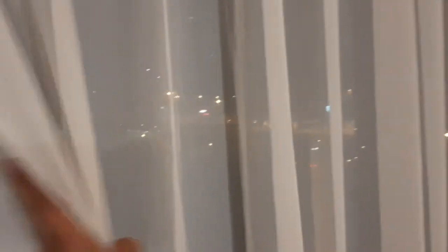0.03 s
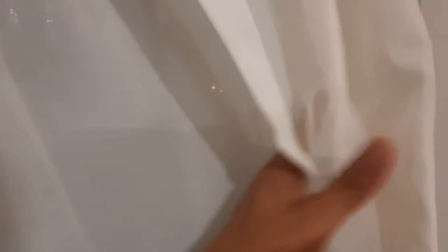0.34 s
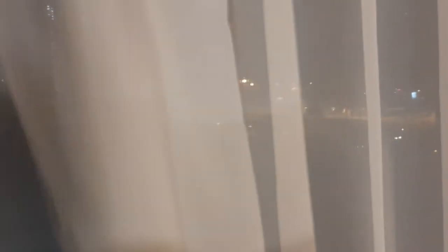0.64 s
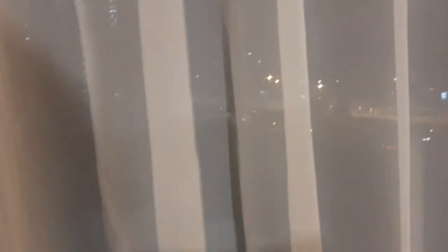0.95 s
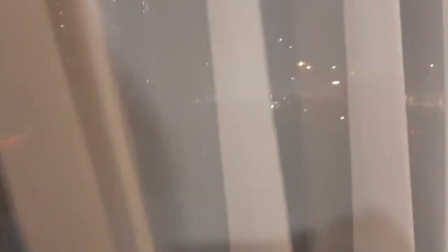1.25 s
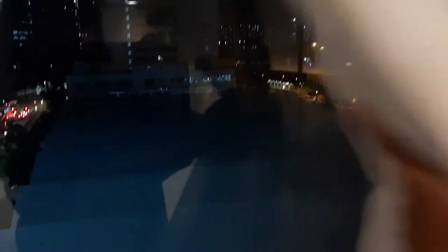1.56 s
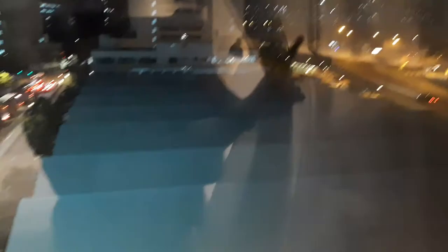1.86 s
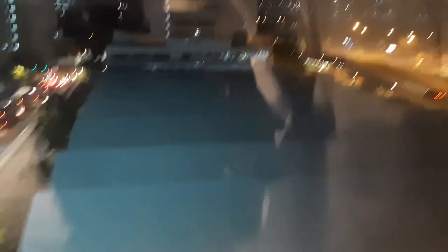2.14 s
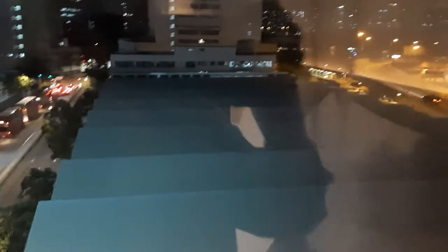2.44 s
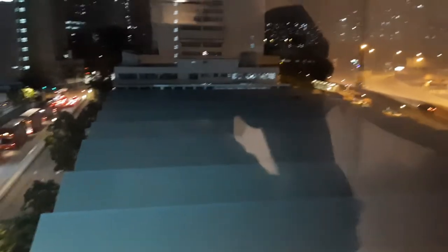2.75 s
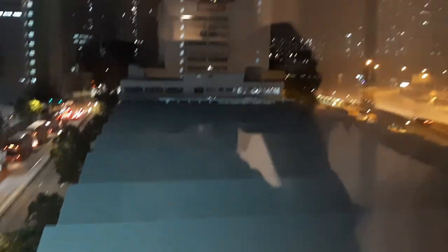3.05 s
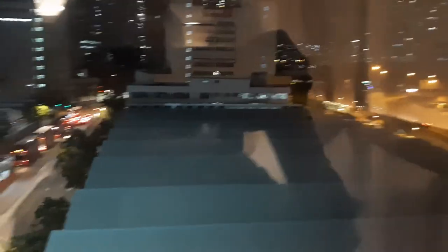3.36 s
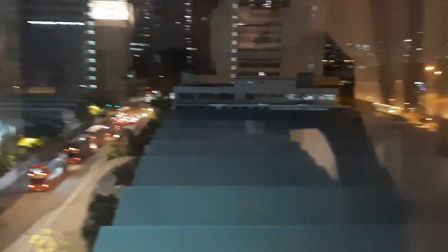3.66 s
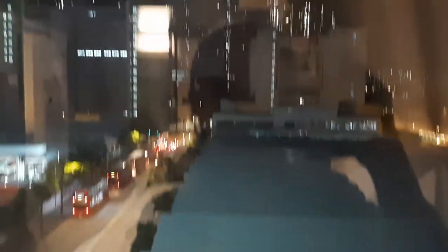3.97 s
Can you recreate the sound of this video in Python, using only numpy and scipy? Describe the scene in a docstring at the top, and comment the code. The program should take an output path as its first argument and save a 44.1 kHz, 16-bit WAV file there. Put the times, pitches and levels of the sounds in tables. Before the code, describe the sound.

Curtains swept aside with a soft rustle and a few dull bumps over ventilation hum.

```python
"""Sheer curtains at a hotel window.

Close on a small stereo microphone, a hand sweeps the curtains aside. The cloth hisses as it slides,
crumples, snaps taut and squeaks on the glass; gliders tick up on the rail. The bumped window frame
rings, and handling thuds and taps on the microphone. Ventilation hums in the room throughout,
and distant city traffic comes faintly through the pane."""
import sys
import numpy as np
from scipy import signal
from scipy.fft import rfft, irfft
from scipy.io import wavfile

SR = 44100
rng = np.random.default_rng(int(sys.argv[2]) if len(sys.argv) > 2 else 0)


def inscribe(sig):
    """Save sig as 16-bit PCM at rate SR to the path in sys.argv[1].

    A 1-D sig is mono; a 2-D sig holds one channel per row.
    Samples are clipped to [-1, 1] before scaling.
    """
    pcm = np.round(np.clip(np.atleast_2d(sig).T, -1, 1) * 32767)
    wavfile.write(sys.argv[1], SR, pcm.astype(np.int16))


N = 176400


def sliding():
    """Threads rub over threads: a fine, fluttering hiss over the dull brushing of the bunched cloth."""
    # spectra of the weave and of the bunched cloth: f/Hz, density/dB per Hz
    weave = [(100, -110), (450, -88.5), (1100, -101), (2000, -98), (3000, -99), (5500, -99), (9000, -101),
             (13000, -100), (16000, -100)]
    brush = [(100, -100), (280, -90), (460, -81), (650, -87.5), (1000, -107.5), (2500, -112), (16000, -140)]
    # their levels through the sweep: t/s, level/dB
    hiss_level = [(0, 4.5), (.12, 3.5), (.36, -5.5), (.76, -3.5), (.83, 1), (.93, -3), (1.05, -7),
                  (1.33, -8), (1.47, 0.5), (1.6, 2), (1.72, 3), (1.95, 6), (2.17, 6), (2.33, 3.5),
                  (2.47, 0), (2.56, -7), (2.8, -13)]
    brush_level = [(0, 0.5), (.5, 1.5), (1.1, -2), (1.75, -1), (1.86, 10), (2.0, 2.5), (2.5, -30)]
    hiss = noise(weave) * amp(curve(hiss_level) + drift(hz=40)) * pan(db=0.25)
    brushing = noise(brush) * amp(curve(brush_level) + 2 * drift(hz=8.7))
    return hiss + brushing


def folds():
    """Each fold buckles in a swell of tiny uneven snaps, strongest near its own pitch."""
    # crumpling folds: t/s, length/s, level/dB, f/Hz
    buckles = [(0.196, 0.034, -1, 3330), (0.39, 0.026, -4, 2420), (0.439, 0.035, -4.5, 3370),
               (0.545, 0.093, -4.5, 3630), (0.795, 0.045, -7.5, 4250), (0.859, 0.041, 3, 3560),
               (1.502, .02, 0, 3750), (1.681, 0.042, 0, 3080), (1.75, 0.027, -3.5, 3150),
               (1.798, 0.039, 0, 3640), (1.828, 0.044, 2.5, 3250), (1.864, 0.025, 2.5, 3700),
               (1.921, 0.027, 6, 3800), (1.978, 0.014, 0, 3550), (2.03, 0.019, -4, 4800),
               (2.242, 0.4, -8.5, 2700)]
    # spectrum of the crumpling: f/Hz, density/dB per Hz
    crumple = [(150, -105), (550, -105.5), (1100, -84.5), (2300, -91), (3400, -88.5), (4600, -89),
               (6200, -88.5), (9000, -104), (16000, -110)]
    snaps_per_s, spread_db = 1500, 1.5
    out, t = np.zeros((2, N)), np.arange(SR // 2) / SR
    for start, length, db, pitch in buckles:
        effort = np.sqrt(np.interp(t / length, [0, 0.17, 1], [0, 1, 0]))
        fires = rng.random(len(t)) < snaps_per_s / SR
        strength = amp(spread_db * np.minimum(rng.exponential(1, len(t)), 3))
        snaps = unit(fires * strength * rng.choice([-1, 1], (2, len(t))))
        resonance = 0.71 + 1.12 * bell(len(t), pitch, octaves=0.11)
        add(out, start, amp(db) * irfft(rfft(snaps * effort) * resonance, len(t)))
    return colour(out, crumple) * np.sqrt(SR / 2)


def ticks():
    """Cloth pulled taut snaps, each time around its own pitch."""
    # snaps of taut cloth: t/s, level/dB, f/Hz
    snaps = [(.2022, -2, 3440), (.584, -5.5, 3870), (0.7975, 11.5, 5700), (0.801, 3, 3040),
             (1.5072, 7.5, 5230), (1.927, 7, 4400), (1.970, 4, 5000)]
    gain_db, decay_s = -45, 0.0016
    out, t = np.zeros((2, N)), np.arange(SR // 20) / SR
    for start, db, pitch in snaps:
        white = rfft(rng.standard_normal((2, len(t))))
        burst = unit(irfft(white * bell(len(t), pitch, octaves=0.61), len(t)))
        add(out, start, amp(gain_db + db) * burst * np.exp(-t / decay_s))
    return out


def flick():
    """Cloth whips over cloth: a bright hiss that rises fast and dies away."""
    start, rise_s, fall_s = 0.768, 0.026, 0.053
    t = np.maximum(np.arange(N) / SR - start, 0)
    swell = np.minimum(t / rise_s, 1) * np.exp(-np.maximum(t - rise_s, 0) / fall_s)
    bright_hiss = unit(np.diff(rng.standard_normal((2, N + 1))))
    return amp(-46) * swell * bright_hiss


def squeaks():
    """Cloth sticks and slips on the glass, off to the right: a thin, unsteady whistle."""
    # slips on the pane: t/s, length/s, level/dB, f/Hz, jitter/fraction of f
    slips = [(1.818, 0.041, -48, 1525, .08), (2.06, 0.18, -60.5, 2040, .016), (2.297, 0.02, -58, 2035, 0)]
    rough_db = 4.5
    out = np.zeros(N)
    for start, length, db, pitch, jitter in slips:
        effort = np.sin(np.pi * np.arange(0, 1, 1 / (length * SR))) ** .5
        phase = 2 * np.pi * np.cumsum(pitch * (1 + jitter * drift(hz=250))) / SR
        whistle = np.sin(phase) * amp(db + rough_db * drift(hz=151))
        add(out, start, effort * whistle[:len(effort)])
    return out * pan(db=-11) / 2


def gliders():
    """Small gliders knock together up on the rail, each a little different in pitch."""
    # clicks on the rail: t/s, level/dB
    clicks = [(.1615, 5.5), (1.055, -2), (1.154, 0.5), (1.239, -1), (1.2435, 1.5), (1.294, -8)]
    # a glider's modes: f/Hz, level/dB, t60/s
    modes = [(5100, 0.5, 0.013), (5970, 4.5, 0.0046), (8640, 7, .011), (13900, -16, 0.008)]
    gain_db, contact_s = -43.5, 0.0021
    out, t = np.zeros((2, N)), np.arange(SR // 10) / SR
    for start, db in clicks:
        contact = 0.88 * rng.standard_normal((2, len(t))) * np.exp(-t / contact_s)
        ring = ringing(modes, t * rng.uniform(.95, 1.05))
        add(out, start, amp(gain_db + db) * (ring + contact) / 2)
    return out + room(out, db=-7)


def bumps():
    """Dull, dry handling thuds on the microphone's left port, while the window frame rings into the room."""
    # bumps: t/s, handling thud level/dB, handling thud f/Hz, frame ring level/dB
    knocks = [(0.482, -44, 520, -42), (1.694, -41, 110, -39.5), (1.7479, -23, 100, -39.5),
              (1.7768, -23.5, 95, -61), (1.788, -18, 129, -39), (1.797, -21.5, 81, -44),
              (1.8094, -25.5, 131, -32), (1.824, -15.5, 77, -28), (1.8372, -27, 200, -35),
              (1.8656, -23, 131, -35.5), (1.91, -50, 155, -32), (2.024, -40, 574, -59),
              (2.111, -35, 663, -37.5), (2.192, -47.5, 615, -52)]
    # modes of frame and pane: f/Hz, level/dB, t60/s
    modes = [(282, -10.5, 0.1), (390, -2.5, 0.088), (477.7, 0, 0.12), (556, -12, 0.14), (633, -4, 0.051),
             (990, -11.5, 0.029), (1447, -12, 0.018)]
    thud_s, ring_rise_s, right_db = 0.0034, 0.00054, -17.5
    handling, frame, t = np.zeros((2, N)), np.zeros((2, N)), np.arange(SR // 2) / SR
    push = t / thud_s * np.exp(1 - t / thud_s)
    for start, thud_db, thud_hz, ring_db in knocks:
        thud = push * np.sin(2 * np.pi * thud_hz * t) * amp([[0], [right_db]])
        ring = ringing(modes, t) * (1 - np.exp(-t / ring_rise_s))
        add(handling, start, amp(thud_db) * thud)
        add(frame, start, amp(ring_db) * ring / 2)
    return handling + frame + room(frame)


def taps():
    """Handling noise, mostly at the right port: a finger's pulse, a rattle, the ring of the spot struck."""
    # fingers on the microphone's case: t/s, level/dB, f/Hz
    knocks = [(1.9165, -6, 1600), (1.941, -8, 1520), (2.1207, -3.5, 990), (2.1773, -14, 1110),
              (2.195, -15, 1010)]
    # response of the hollow case: f/Hz, gain/dB
    hollow_case = [(100, -9), (480, 7), (750, 1.5), (1150, 0), (1600, -7.5), (2250, -7.5), (3200, -35),
                   (16000, -20)]
    gain_db, rattle_s, ring_s = -23.5, 0.0024, 0.003
    out, t = np.zeros((2, N)), np.arange(SR // 50) / SR
    pulse = 4 * (t == 0)
    for start, db, pitch in knocks:
        rattle = 0.32 * rng.standard_normal((2, len(t))) * np.exp(-t / rattle_s)
        ring = 0.095 * np.cos(2 * np.pi * pitch * t) * np.exp(-t / ring_s)
        add(out, start, amp(gain_db + db) * (pulse + rattle + ring))
    return colour(out, hollow_case) * pan(db=-17.5)


def ventilation():
    """Room tone: a motor's hum and its octave over the rumble of moving air, which grows with it."""
    # the hum, louder by the window: t/s, level/dB
    hum_level = [(0, -42.5), (1.4, -43.5), (2.2, -41), (3, -40.5)]
    # moving air: f/Hz, density/dB per Hz
    rumble = [(24, -100), (35, -63.5), (44, -82.5), (57, -62), (78, -89.5), (145, -68.5), (210, -80.5),
              (300, -87), (450, -85.5), (700, -96), (1500, -101), (3000, -114), (8000, -133), (16000, -121)]
    hum_hz, level = 100, curve(hum_level)
    phase = 2 * np.pi * hum_hz * np.arange(N) / SR + 0.24 * drift(hz=0.71)
    octave = amp(-17 + 2.5 * drift(hz=4)) * np.sin(2 * phase + .5 * drift(hz=7))
    air = noise(rumble) * amp(0.73 * (level - level.mean()))
    hum = np.sqrt(2) * (np.sin(phase) + octave) * amp(level + 0.43 * drift(hz=7.4))
    return hum + air


def traffic():
    """A distant wash of road noise through the pane, a little to the right."""
    # traffic behind the glass: f/Hz, density/dB per Hz
    road = [(30, -67), (180, -76.5), (300, -80), (560, -99), (880, -87.5), (1200, -98), (1540, -96),
            (2010, -94.5), (2700, -103), (4000, -112), (5600, -112), (7300, -133), (16000, -121)]
    # its level as the curtain opens: t/s, level/dB
    opening = [(0, -2.5), (1.3, -4), (2.3, -2), (2.82, -2.5), (3.13, 2.5), (3.35, -0.5), (3.72, -3),
               (3.86, 3)]
    return noise(road) * amp(curve(opening) + 1.58 * drift(hz=6.6)) * pan(db=-4)


def room(x, db=-4.5):
    """The short tail of a furnished room, without the direct sound."""
    t60, first_echo_s = 0.41, 0.004
    t = np.arange(SR // 2) / SR
    tail = rng.standard_normal((2, len(t))) * amp(-60 * t / t60) * (t > first_echo_s)
    return amp(db) * signal.oaconvolve(x, tail / np.linalg.norm(tail[0]), axes=1)[:, :N]


def noise(points):
    """Diffuse stereo noise with the given dB per Hz, alike at both ports in the bass."""
    # likeness of left and right: f/Hz, correlation/0-1
    likeness = [(100, 0.88), (290, 0.84), (640, 0.55), (1400, 0), (16000, 0)]
    same = spectrum(likeness)
    left, independent = rfft(rng.standard_normal((2, N)))
    right = same * left + np.sqrt(1 - same ** 2) * independent
    return irfft(np.array([left, right]) * amp(spectrum(points)), N) * np.sqrt(SR / 2)


def ringing(modes, t):
    """Dying modes; the higher ones reach the two ports out of step."""
    hz, level, t60 = np.transpose(modes)[:, :, None]
    phase = 2 * np.pi * rng.random(hz.shape) + rng.standard_normal((2, len(hz), 1)) * hz / 1500
    return (amp(level - 60 * t / t60) * np.sin(2 * np.pi * hz * t + phase)).sum(1)


def bell(size, pitch, octaves):
    """A resonance curve over the bins of a short sound."""
    octaves_off = np.log2((np.fft.rfftfreq(size, 1 / SR) + 1) / pitch)
    return 1 / (1 + (octaves_off / octaves) ** 2)


def colour(x, points):
    """Minimum-phase filter with the given response (f/Hz, gain/dB)."""
    log_gain = np.log(amp(spectrum(points)))
    mirrored = np.concatenate([log_gain, log_gain[-2:0:-1]])
    impulse = np.fft.ifft(np.exp(np.conj(signal.hilbert(mirrored)))).real[:8192]
    return signal.oaconvolve(x, impulse[None], axes=1)[:, :N]


def spectrum(points):
    """A spectrum at every bin, straight on a log-frequency axis."""
    hz, value = np.transpose(points)
    return np.interp(np.log(np.fft.rfftfreq(N, 1 / SR) + 1), np.log(hz), value)


def curve(points):
    """A time curve at every sample."""
    return np.interp(np.arange(N) / SR, *np.transpose(points))


def drift(hz):
    """Random motion up to about hz, rms 1."""
    lowpass = np.exp(-(np.fft.rfftfreq(N, 1 / SR) / hz) ** 2)
    return unit(irfft(rfft(rng.standard_normal(N)) * lowpass, N))


def pan(db):
    """Gains for a left-minus-right level."""
    return amp([[db / 2], [-db / 2]])


def amp(db):
    """Decibels to gain."""
    return 10 ** (np.asarray(db) / 20)


def unit(x):
    """Scales to rms 1."""
    return x / np.sqrt(np.mean(x ** 2) + 1e-20)


def add(mix, start, sound):
    """Mixes a sound in at its start, in seconds."""
    part = mix[..., max(round(start * SR), 0):][..., :sound.shape[-1]]
    part += sound[..., :part.shape[-1]]


def scene():
    """Curtain and knocks close up, over room tone and the far street."""
    cloth = folds() + ticks() + squeaks()
    foreground = cloth + room(cloth) + bumps() + gliders() + flick() + taps() + sliding()
    return foreground + ventilation() + traffic()


def record(dry):
    """The small stereo microphone: each port's own colour, then the low cut and the band limit."""
    # response of the ports: f/Hz, left gain/dB, right gain/dB
    ports = [(200, 0, -1.5), (680, -2, -2.5), (1380, 0, 2), (1510, 5, 7.5), (1670, 1.5, 3.5),
             (2420, -4, 6.5), (4020, -2, 5), (5750, -5, 4), (6730, -7, -8), (7800, -4, -22),
             (8550, -12.5, -24.5), (10280, -6, -11), (11600, -2, -0.5), (14160, -7.5, 8), (16700, 11, -9)]
    low_cut_hz, edge_hz = 30, 15780
    left = colour(dry[:1], np.array(ports)[:, [0, 1]])
    right = colour(dry[1:], np.array(ports)[:, [0, 2]])
    low_cut = signal.butter(4, low_cut_hz, "high", fs=SR, output="sos")
    band_limit = signal.firwin(511, edge_hz, window=("kaiser", 9), fs=SR)
    heard = signal.sosfilt(low_cut, np.vstack([left, right]))
    return signal.oaconvolve(heard, band_limit[None], "same")


dry = scene()
out = record(dry)
inscribe(out)
```